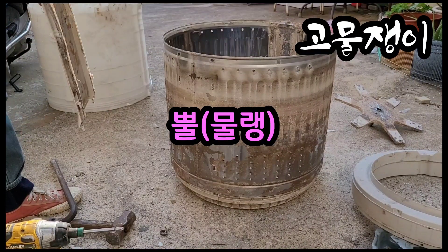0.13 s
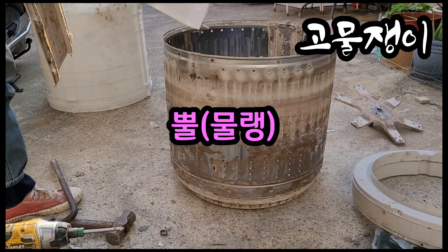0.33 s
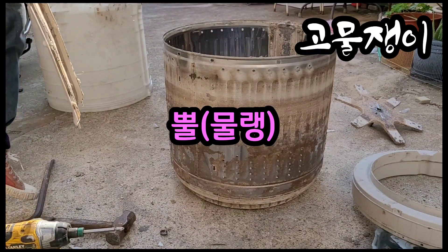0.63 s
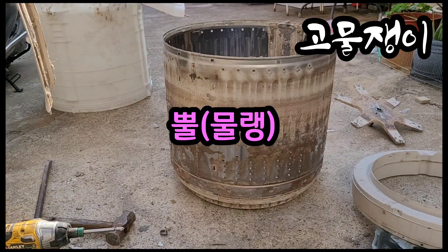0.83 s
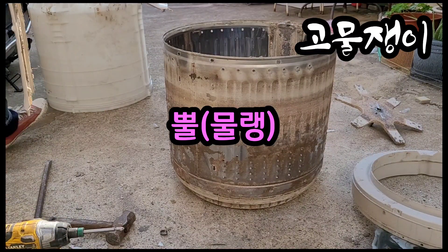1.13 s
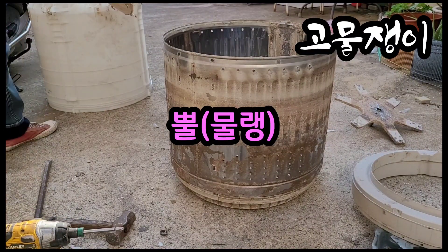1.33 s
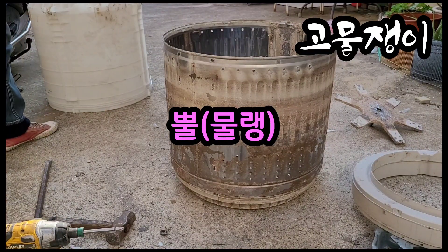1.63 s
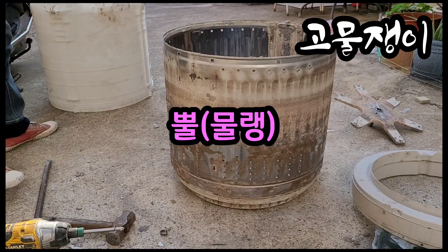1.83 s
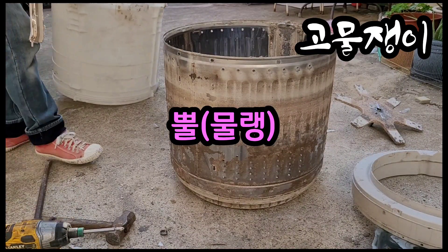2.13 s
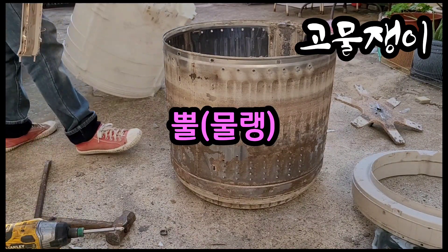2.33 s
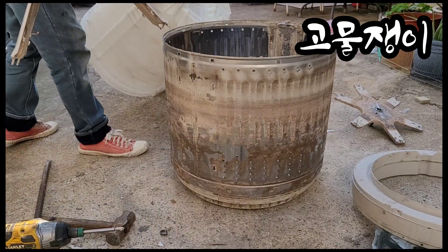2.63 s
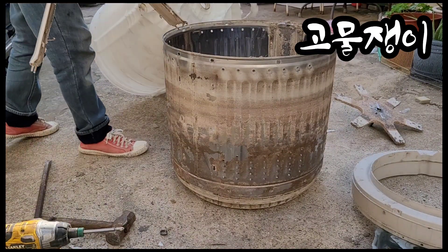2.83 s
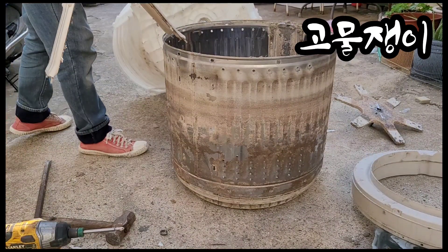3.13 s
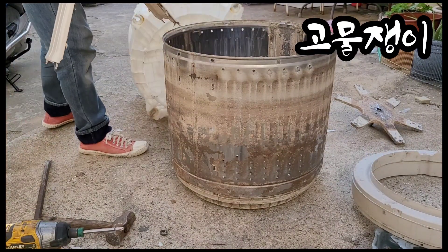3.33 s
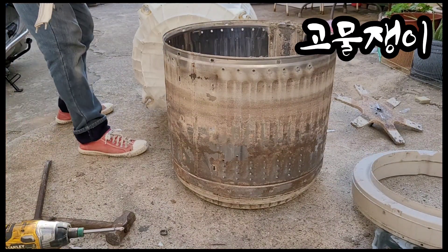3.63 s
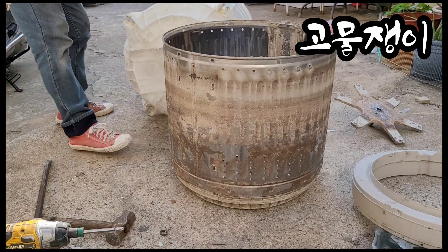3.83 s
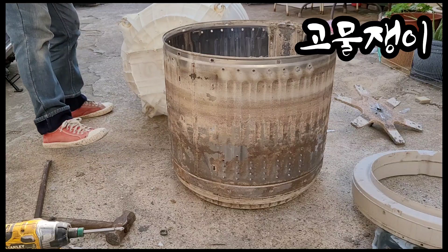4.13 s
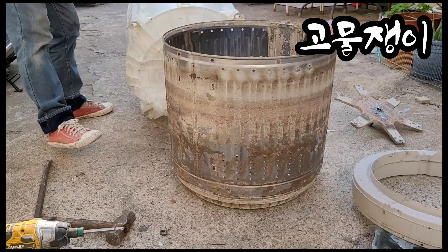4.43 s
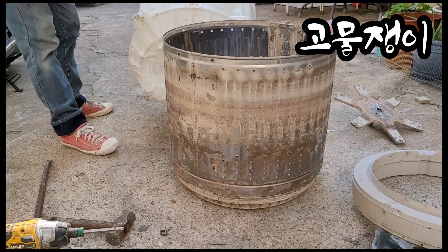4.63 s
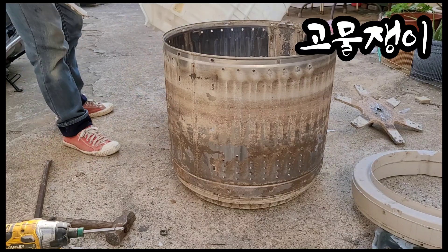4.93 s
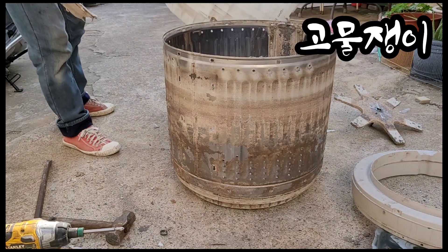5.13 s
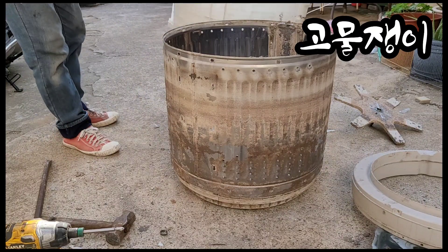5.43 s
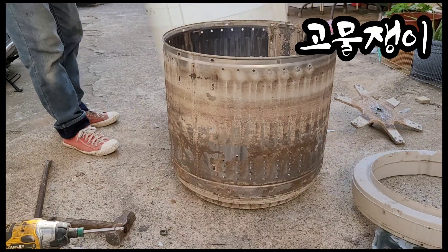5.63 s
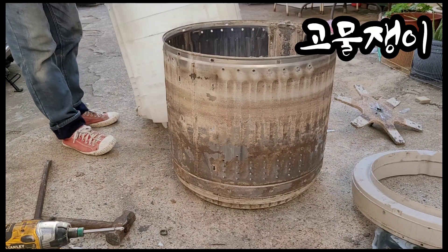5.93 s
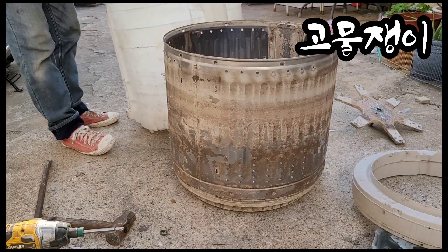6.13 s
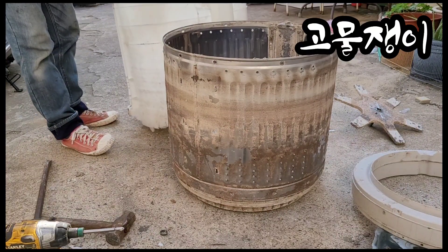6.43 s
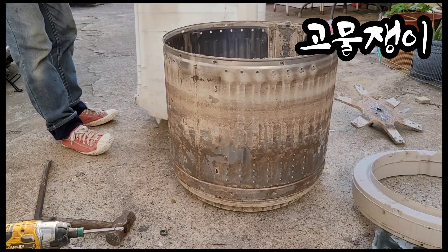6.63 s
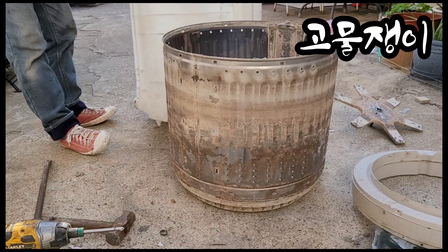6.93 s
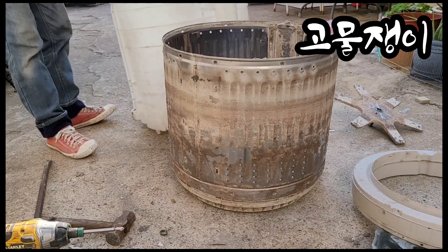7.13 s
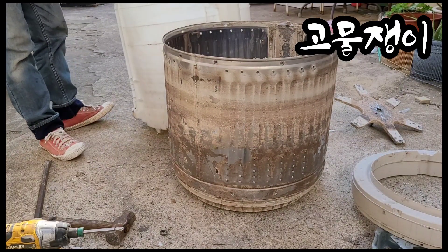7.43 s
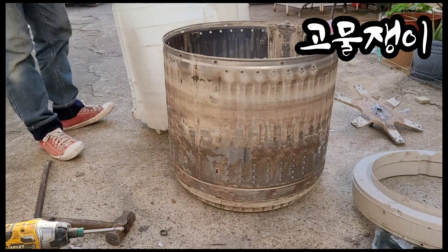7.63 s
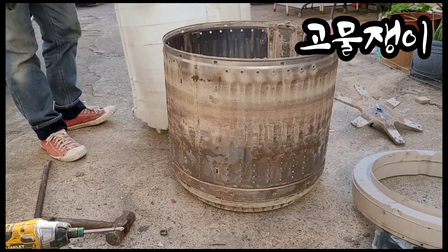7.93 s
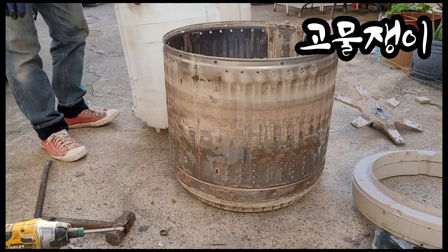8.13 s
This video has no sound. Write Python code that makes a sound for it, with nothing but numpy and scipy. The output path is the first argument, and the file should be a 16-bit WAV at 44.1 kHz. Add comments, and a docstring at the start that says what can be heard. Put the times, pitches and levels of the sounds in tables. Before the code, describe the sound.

After a short steel clatter, a big plastic tub is tipped, rolled and banged down outdoors, with hollow clacks, low booms and gritty scrapes.

```python
"""A light scrape and a few knocks of a plastic washing-machine tub, then a steel bar clatters onto concrete.
The tub is tipped, rolled against a steel drum and banged down: its walls clack, its floor booms, the air
inside sings on, and its rim judders over grit. The bumped drum hums and a tool chinks once.
Behind it all: a short tail off the yard's walls, low neighbourhood rumble and a faint far-off whine."""
import sys
import numpy as np
from scipy import signal
from scipy.fft import rfft, irfft, next_fast_len
from scipy.io import wavfile
from scipy.ndimage import uniform_filter1d

SR = 44100
rng = np.random.default_rng(int(sys.argv[2]) if len(sys.argv) > 2 else 0)


def file_out(sig):
    """Save sig as 16-bit WAV at sys.argv[1]."""
    # one column per channel
    cols = np.atleast_2d(sig).T
    # limit, then scale
    lim = np.clip(cols, -1, 1)
    pcm = np.round(lim * 32767).astype(np.int16)
    wavfile.write(sys.argv[1], SR, pcm)


N = 364707

# hits on the tub: t/s, body level/dB, body centre f/Hz, clack level/dB, crack level/dB, boom level/dB, t60/s
TUB_HITS = [(0.084, -40, 384, -44.5, -43, -62, 0.097), (.457, -37.5, 460, -54, -72, -54, 0.031),
            (.477, -41, 385, -46.5, -59, -55, 0.077), (.915, -27, 270, -27.5, -36, -32, .15),
            (.952, -28, 244, -38, -58, -43, 0.13), (1.005, -32, 584, -25, -63, -55, 0.16),
            (2.05, -26.5, 604, -53, -58, -32, 0.18), (2.066, -27, 259, -58, -68, -9, 0.24),
            (2.137, -45, 400, -67, -77, -12, .1), (2.185, -10, 750, -20, -32.5, -17, 0.12),
            (2.208, -18, 685, -25.5, -42, -35, 0.17), (2.349, -23.5, 430, -28, -48, -36, 0.15),
            (2.368, -16, 690, -28, -39, -21.5, 0.13), (2.393, -28, 480, -43, -58, -30, 0.11),
            (2.644, -55, 450, -47.5, -59, -29.5, 0.24), (3.149, -43, 477, -62, -72, -34.5, 0.11),
            (3.523, -20, 650, -33, -59, -39, 0.074), (3.569, -6.5, 587, -11, -39, -3.5, 0.059),
            (3.605, -22.5, 280, -31, -46, -11.5, 0.37), (3.674, -40, 403, -62, -70, -12.5, .1),
            (3.736, -30.5, 330, -55, -81, -11.5, 0.36), (3.798, -27.5, 680, -41, -53, -36, 0.17),
            (3.862, -22, 545, -47, -68, -7.5, 0.11), (3.947, -29, 300, -41, -48, -6, 0.14),
            (3.958, -37, 400, -28.5, -41, -20, 0.17), (4.582, -32.5, 655, -35.5, -64, -55, 0.17),
            (4.893, -44, 764, -27, -43, -56, 0.24), (5.07, -35.5, 515, -65, -62, -34.5, 0.13),
            (5.678, -24.5, 602, -47, -65, -45, 0.11), (5.812, -13, 710, -14, -16.5, -16, 0.15),
            (5.83, -13, 400, -20, -24.5, -5.5, 0.17), (5.87, -16.5, 446, -52, -64, -36, 0.12),
            (5.898, -29, 446, -50, -64, -9.5, 0.084), (6.011, -20.5, 377, -16.5, -24.5, -3, .16),
            (6.098, -17.5, 550, -39, -58, -24, 0.14), (6.11, -30, 300, -55, -70, -5.5, .12),
            (6.162, -18, 494, -40, -68, -10, .14), (6.223, -31, 450, -60, -76, -7.5, 0.12),
            (6.266, -25, 497, -31.5, -53, -20, 0.25), (6.301, -27, 450, -46, -46.5, -14, 0.29),
            (6.749, -31.5, 395, -63, -63, -15, 0.087), (6.863, -29, 630, -51, -46.5, -36, 0.12),
            (6.881, -34.5, 400, -55, -72, -11, .12), (6.93, -39, 400, -66, -75, -15.5, 0.064),
            (7.137, -42, 474, -47, -52.5, -26.5, 0.12), (7.233, -48, 400, -64, -70, -20, 0.11),
            (7.29, -29, 440, -56, -74, -23, .1), (7.566, -4.5, 414, -18, -26.5, -16, .18),
            (7.61, -16, 404, -42, -45, -11.5, 0.11), (7.644, -17, 504, -37, -33, -14, .16),
            (7.677, -27, 503, -26, -39, -18, .16), (7.772, -25.5, 740, -30.5, -40.5, -24.5, .13),
            (7.953, -44, 740, -16.5, -29, -28, 0.13), (8.033, -12.5, 390, -27, -62, -13, 0.11),
            (8.081, -46, 505, -25, -54, -47, 0.099), (8.134, -24.5, 347, -57, -77, -18.5, 0.1),
            (8.205, -27, 350, -40.5, -70, -21.5, 0.13)]
# resonances among the wall's dense modes: f/Hz, nominal width/Hz, lift/dB
WALL_PEAKS = [(320, 23, 1.5), (360, 14, 5.5), (420, 35, 4.5), (513.7, 18, 3.5), (795, 50, 3), (1010, 26, 2),
              (1163, 43, 3), (1312, 72, 2.5), (1370, 34, 0), (1684, 13, -1), (1746, 21, -4), (1975, 43, 4),
              (2096, 62, 3.5), (2050, 20, 2.5), (2550, 42, -3), (2692, 90, 3.5), (3133, 22, 7.5),
              (3310, 60, -0.5), (3500, 25, 2), (3250, 17, -1.5)]
# tone of the wall's clack: f/Hz, level/dB
CLACK_TONE = [(300, -17.5), (750, 4.5), (1150, 5.5), (1600, 3.5), (2100, -3), (3000, -13), (5000, -32.5),
              (12000, -66.5)]
# tone of cracks and grit: f/Hz, level/dB
CRACK_TONE = [(800, -29), (2200, 2.5), (3300, -1.5), (5000, -6), (6500, -10), (8200, -7.5), (11000, -12.5),
              (15500, -12)]
# the floor's note climbs as the tub is tipped, then stood on end: t/s, f/Hz
FLOOR_NOTE = [(2.1, 86), (2.35, 106.7), (3.55, 124), (3.96, 122.1), (5.83, 147), (6.3, 133.2), (7.3, 132.8),
              (7.6, 156), (8.1, 167.1)]
# shoves over the concrete: t/s, length/s, rub level/dB, rasp level/dB, grit level/dB, swell/dB
SHOVES = [(0, 0.11, -55.5, -57.5, -52, 6.5), (0.57, 0.49, -58.5, -57, -57.5, 21),
          (1.889, 0.099, -52, -56, -69, -13), (2.055, 0.19, -40, -67, -61, 9),
          (2.196, 0.24, -34.5, -44, -62, -5.5), (3.162, 0.24, -51, -60.5, -66.5, -8.5),
          (3.426, 0.15, -39.5, -48.5, -67, 4.5), (3.506, 0.052, -24, -27, -41.5, 1),
          (3.785, 0.18, -28.5, -43.5, -51, 1.5), (4.052, .12, -47, -80, -91, -4),
          (4.431, 0.165, -57, -44.5, -63.5, 8), (4.814, 0.067, -47, -42.5, -54.5, 12.5),
          (4.96, 0.027, -37.5, -49, -57.5, -1.5), (5.688, 0.14, -45.5, -47.5, -52, 18),
          (5.832, 0.24, -39, -47, -52, -4), (6.052, .28, -38, -48, -56, 3.5),
          (6.35, 0.1, -55, -54, -54.5, -9), (6.701, .2, -53.5, -68, -65.5, -18),
          (7.257, 0.018, -46, -49.5, -68, 2), (7.374, 0.021, -48, -52, -52.5, 0.5),
          (7.551, 0.26, -32, -49, -43, -14), (7.83, 0.16, -41.5, -44.5, -62, 5),
          (7.933, 0.042, -47, -38, -39, 4), (8.046, 0.3, -53.5, -51.5, -65, 8)]
# tone of the rim's rub: f/Hz, level/dB
RUB_TONE = [(100, -24.5), (220, 6), (400, 1.5), (800, 1.5), (1400, -15.5), (2200, -15), (3500, -25.5),
            (8000, -78)]
# tone of the rim's rasp: f/Hz, level/dB
RIM_RASP_TONE = [(250, -33.5), (550, 6), (900, 0.5), (1300, 7.5), (1650, -10), (2200, -19.5), (3300, -15),
                 (5000, -47.5), (12000, -37)]
# the tub rolls on its edge: t/s, length/s, rumble level/dB, quiver level/dB, swell/dB
TUB_ROLLS = [(2.216, .3, -40, -29.5, -12.5), (3.137, .12, -51, -41.5, 12), (3.476, .1, -36.5, -31, -10),
             (3.596, 0.53, -30.5, -29, -4), (4.15, 1.12, -45.5, -57, 0), (6.057, 0.29, -22, -21.5, -2.5),
             (6.367, 0.16, -36, -43, -2.5), (6.691, 0.66, -35.5, -36, -6), (7.58, 0.78, -45, -33.5, -10)]
# snaps of grit, splinters and the tub's brittle edge: t/s, level/dB, centre f/Hz, t60/s
DRY_SNAPS = [(0.08, -40.5, 3000, 0.045), (.353, -34.5, 3450, 0.03), (0.513, -41.5, 3860, 0.034),
             (0.662, -48.5, 4300, 0.052), (.872, -24.5, 3520, 0.0072), (1.488, -54, 1920, 0.22),
             (1.65, -51.5, 2900, 0.024), (2.895, -50.5, 1790, 0.12), (3.219, -52, 4060, 0.093),
             (3.432, -51, 3500, 0.14), (3.572, -22, 3240, 0.028), (4.894, -40, 1370, 0.068),
             (6.014, -27.5, 9900, .089), (6.321, -42, 4660, 0.028), (6.601, -46.5, 3000, 0.032),
             (6.715, -51, 2460, 0.058), (7.022, -56, 11000, .09), (7.243, -54, 4440, 0.024),
             (7.396, -47, 2500, .04), (7.568, -13.5, 2240, 0.013)]
# dull thuds on the ground: t/s, level/dB, f/Hz
GROUND_THUDS = [(1.914, -29.5, 95.7), (2.012, -32.5, 102), (4.512, -28, 75), (4.738, -22.5, 58),
                (4.785, -27, 95), (5.237, -24, 51.6), (5.699, -22.5, 64.5), (6.58, -31, 78)]
# the bar's contacts: t/s, level/dB, share taken on the flank rather than the tip/0-1
BAR_CONTACTS = [(0.917, -44.5, 0.4), (0.923, -32.5, 0.32), (1.003, -30, 0.6), (1.027, -29, 1),
                (1.049, -33.5, 1)]
# the bar's modes: f/Hz, tip-struck level/dB, flank-struck level/dB, t60/s before extra damping
BAR_MODES = [(1749, 1, -4, 0.31), (1841, -4, 0, 0.3), (2178, -7, -1, 0.24), (2515, -20, -22, 0.31),
             (2625, -17, -16, 0.33), (2766, -10, -6, 0.29), (3116, 3, -4, 0.33), (3327, -17, -16, 0.32),
             (3877, -12, -7, 0.29), (3957, -12, -7, 0.29), (4310, -10, -10, 0.28), (4983, -18, -9, 0.22),
             (5286, -13, -13, 0.31), (5601, -23, -15, 0.28), (6397, -22, -14, 0.23), (6905, -26, -6, 0.19),
             (7686, -21, -8, 0.19), (7996, -18, -9, 0.19), (8384, -11, -8, 0.21), (8724, -16, -11, 0.21),
             (9224, -18, -14, 0.24), (9789, -20, -18, 0.25), (10427, -17, -11, 0.26),
             (10625, -19, -12, 0.27), (11200, -23, -19, 0.34), (11674, -25, -15, 0.22),
             (12538, -30, -12, 0.19), (13459, -23, -16, 0.23), (14486, -25, -14, 0.21),
             (14657, -24, -13, 0.21)]
# bumps against the drum: t/s, level/dB
DRUM_BUMPS = [(3.571, -37.5), (3.951, -36), (5.832, -37)]
# the drum's modes: f/Hz, level/dB, t60/s
DRUM_MODES = [(249, 3.5, 1.8), (267.3, 3, 1.9), (270, 3, 1.7), (293, -11, 1.5), (290.7, -3, 2.9),
              (302, -5.5, 1.5), (313, 0.5, 1.2), (392, -15, 3.2), (443, -20, 1), (507, -18, 2.3)]
# a steel tool's modes: f/Hz, level/dB, t60/s
TOOL_MODES = [(4970, -56, 0.19), (5800, -44.5, 0.13), (6530, -48, 0.12), (7720, -40.5, 0.19),
              (8700, -46, 0.11), (9760, -49, 0.13), (11730, -58, 0.16), (12580, -57, 0.16)]
# path of the far-off whine: t/s, f/Hz, level/dB
FAR_WHINE = [(1.27, 830, -57), (1.308, 857, -54.5), (1.35, 744, -60), (1.4, 706, -47.5), (1.441, 766, -50),
             (1.6, 767, -53.5), (1.951, 766, -53), (2.05, 763, -58)]
# tone of the neighbourhood: f/Hz, level/dB
AMBIENCE_TONE = [(12, -30), (20, 0.5), (72, 2), (163, -17), (301, -17.5), (399, -15), (542, -21.5),
                 (759, -15.5), (1090, -28), (1330, -24.5), (1610, -31), (6720, -48), (12800, -47.5),
                 (16000, -69.5)]
# stereo width: f/Hz, likeness of left and right/0-1
STEREO_LIKENESS = [(30, 0.13), (70, 0.73), (140, 0.45), (260, 0.98), (500, 0.87), (1200, 0.33),
                   (4000, 0.92), (14000, .6)]
# stereo phase: f/Hz, lead of the left side/rad
LEFT_LEAD = [(40, .1), (150, 0.057), (300, 0.71), (600, 1.46), (1200, 2.6), (4000, 1.78), (14000, 1.5)]
# the tub stands a little to the left: f/Hz, left minus right level/dB
TUB_PAN = [(100, -1.5), (450, 0.5), (1100, 1), (2500, 2), (5000, 0.5), (13000, 1.5)]


def tub_knocks():
    """Each hit wakes the hollow body, the stiff wall and a crack at the point of contact."""
    out = np.zeros((2, N))
    for s, body_db, body_hz, clack_db, crack_db, _, t60 in TUB_HITS:
        def colour(hz):
            body = amp(body_db) * unit(hump(hz, body_hz, sharpness=1.0) * tub_wall(hz))
            clack = amp(clack_db) * unit(amp(curve(CLACK_TONE, hz)) * tub_wall(hz))
            crack = amp(crack_db) * unit(amp(curve(CRACK_TONE, hz)))
            return np.sqrt(body ** 2 + clack ** 2 + crack ** 2)
        add(out, s, burst(colour, t60, tick=0.14))
    return out


def tub_wall(hz):
    """The wall's resonances, as a set of bell-shaped boosts and cuts."""
    return amp(sum(db * np.exp(-2.8 * ((hz - f) / (1.3 * width)) ** 2) for f, width, db in WALL_PEAKS))


def tub_booms(cavity_hz=152.6, cavity_db=-14, cavity_t60=0.73, build_s=0.02, lag_s=0.002, cycles=19):
    """Each hit sets the tub's floor swinging; the air inside takes up the energy and sings on."""
    out, t = np.zeros((2, N)), np.arange(SR) / SR
    build = 1 - np.exp(-(t / build_s) ** 2)
    cavity = build * amp(cavity_db - 60 * t / cavity_t60) * np.sin(2 * np.pi * cavity_hz * t)
    for s, *_, boom_db, _ in TUB_HITS:
        hz = np.interp(s, *np.transpose(FLOOR_NOTE))
        add(out, s + lag_s, amp(boom_db) * swing(hz, t60=cycles / hz))
        add(out, s + lag_s, amp(boom_db) * cavity)
    return out


def swing(hz, t60, rise_s=0.0051, sag=0.054):
    """A low note that sags as the flex relaxes, with slower rocking below and a short overtone above."""
    t = np.arange(SR // 2) / SR
    sides = np.array([[-1], [1]])
    envelope = (1 - np.exp(-(t / rise_s) ** 2)) * amp(-60 * t / t60)
    turns = np.cumsum(hz * (1 + sag * np.exp(-t / 0.028))) / SR
    flex = np.sin(2 * np.pi * turns + 0.12 * sides)
    rock = np.exp(-t / 0.015) * np.sin(2 * np.pi * (0.666 * turns + rng.random()) + 0.6 * sides)
    overtone = amp(-60 * t / 0.11) * np.sin(2 * np.pi * (1.5 * turns + rng.random()) - 0.4 * sides)
    return envelope / envelope.max() * (flex + amp(-11) * (rock + overtone))


def tub_scrapes():
    """With each shove the rim judders over the concrete, rasps and crushes grit."""
    s, length, rub_db, rasp_db, grit_db, swell_db = np.transpose(SHOVES)
    rub = stream(slips(per_s=900), lambda hz: amp(curve(RUB_TONE, hz)) * tub_wall(hz))
    grit = stream(slips(per_s=2500), lambda hz: amp(curve(CRACK_TONE, hz)))
    rasp = stream(slips(per_s=520), lambda hz: amp(curve(RIM_RASP_TONE, hz)) * tub_wall(hz))
    return sum(sound * strokes(s, length, db, swell_db, attack_s=0.02, t60=0.29)
               for sound, db in [(rub, rub_db), (rasp, rasp_db), (grit, grit_db)])


def slips(per_s, judder_db=2.0):
    """Uneven stick-slip clicks over a fine hiss, surging as the rim grips and lets go."""
    sizes = rng.exponential(1, N) * (rng.random(N) < per_s / SR)
    grip = wobble(N, span=400)
    clicks = unit(sizes * rng.choice([-1., 1.], (2, N)))
    hiss = 0.83 * rng.standard_normal((2, N))
    return amp(judder_db * grip) * (clicks + hiss)


def tub_rolls(rumble_hz=75, jolt_hz=14):
    """The rolling weight rumbles, and small jolts keep the floor quivering at its own note."""
    s, length, rumble_db, quiver_db, swell_db = np.transpose(TUB_ROLLS)
    rumble = stream(rng.standard_normal((2, N)), lambda hz: hump(hz, rumble_hz, sharpness=1.03))
    lowpass = signal.butter(2, jolt_hz, fs=SR, output="sos")
    jolts = signal.sosfilt(lowpass, rng.standard_normal(N) + 1j * rng.standard_normal(N))
    turns = np.cumsum(np.interp(np.arange(N) / SR, *np.transpose(FLOOR_NOTE))) / SR
    quiver = unit(np.sqrt(abs(jolts)) * np.sin(2 * np.pi * turns + np.angle(jolts)))
    return sum(sound * strokes(s, length, db, swell_db, attack_s=0.014, t60=0.22)
               for sound, db in [(rumble, rumble_db), (quiver, quiver_db)])


def grit_snaps(crack_db=-17):
    """Grit and splinters snap: one band of noise with a little broad crack under it."""
    out = np.zeros((2, N))
    for s, db, centre_hz, t60 in DRY_SNAPS:
        def colour(hz):
            return amp(db) * (hump(hz, centre_hz, sharpness=1.1) + amp(crack_db + curve(CRACK_TONE, hz)))
        add(out, s, burst(colour, t60, tick=0.33))
    return out


def ground_thuds(t60=0.17):
    """Soft, low thuds with no clack."""
    out = np.zeros((2, N))
    for s, db, hz in GROUND_THUDS:
        add(out, s, amp(db) * swing(hz, t60))
    return out


def steel_bar(jangle_db=-5, smear_hz=90, damping=1.25, twin_db=-8, detune=0.008, db_per_octave=1.5):
    """The bar lands tip first and rattles flat; every contact adds energy to its modes."""
    out, t = np.zeros((2, N)), np.arange(SR) / SR
    hz, tip_db, flank_db, t60 = np.transpose(BAR_MODES)[:, :, None]
    bright_db = db_per_octave * np.log2(hz / hz[0])  # the higher modes ring a little louder
    energy, landing_s = 0, BAR_CONTACTS[0][0]
    for s, db, flank in BAR_CONTACTS:
        mode_db = tip_db + flank * (flank_db - tip_db) + bright_db
        age = t - (s - landing_s)
        energy = energy + (age >= 0) * amp(db + mode_db - 60 * damping * abs(age) / t60) ** 2

        def jangle(f):  # chatter on the concrete smears each mode into a narrow band
            bands = amp(mode_db) / (1 + ((f - hz) / smear_hz) ** 2) ** 2
            return amp(db + jangle_db) * unit(bands.sum(0))
        add(out, s, burst(jangle, t60=0.38, tick=0.25))
    # the bar bends in two planes, so each mode has a weaker twin close by
    twin_hz = hz * (1 + detune * rng.standard_normal(hz.shape))
    for plane_db, plane_hz in (0, hz), (twin_db, twin_hz):
        phase = rng.uniform(0, 2 * np.pi, hz.shape) + np.array([-0.7, 0.7])[:, None, None]
        modes = np.sqrt(energy) * np.sin(2 * np.pi * plane_hz * t + phase)
        add(out, landing_s, amp(plane_db) * modes.sum(1))
    return out


def tool_chink(at_s=2.368):
    """A steel tool on the ground rings once, high and short."""
    out = np.zeros((2, N))
    add(out, at_s, ring(TOOL_MODES, spread_rad=0.94))
    return out


def drum_hum():
    """The steel drum's close, low modes hum on after each bump."""
    out = np.zeros((2, N))
    for s, db in DRUM_BUMPS:
        add(out, s, amp(db) * ring(DRUM_MODES, spread_rad=0.39))
    return out


def yard_reverb(x, wet_db=-12, echoes_per_s=3000, predelay_s=0.014):
    """Nearby walls return a short tail with little bass."""
    t60 = [(200, 0.68), (1000, 0.22), (4000, 0.26), (14000, 0.066)]  # f/Hz, t60/s
    tone = [(100, -6.5), (300, -1.0), (3000, 1), (14000, 7.5)]  # f/Hz, level/dB
    echoes = rng.choice([-1., 1.], (2, SR)) * (rng.random((2, SR)) < echoes_per_s / SR)
    echoes *= np.arange(SR) / SR > predelay_s
    hz, t, spectra = signal.stft(echoes, SR, nperseg=256)
    fade = amp(curve(tone, hz)[:, None] - 60 * t / curve(t60, hz)[:, None])
    _, tail = signal.istft(spectra * fade, SR, nperseg=256)
    return amp(wet_db) * signal.fftconvolve(x, tail / np.linalg.norm(tail[0]), axes=1)[:, :N]


def far_whine():
    """One faint, wavering tone in the distance."""
    s, hz, db = np.transpose(FAR_WHINE)
    t = np.arange(N) / SR
    turns = np.cumsum(np.interp(t, s, hz)) / SR
    return amp(np.interp(t, s, db, left=-120, right=-120)) * np.sin(2 * np.pi * turns)


def neighbourhood(level_db=-47.5):
    """A steady bed of low outdoor rumble."""
    return amp(level_db) * stream(rng.standard_normal((2, N)), lambda hz: amp(curve(AMBIENCE_TONE, hz)))


def burst(colour, t60, tick, ripple_db=3.0, rattles_per_s=70, size=16384):
    """A sharp contact, then countless overlapping modes dying together while the edge chatters."""
    t, hz = np.arange(size) / SR, np.fft.rfftfreq(size, 1 / SR)
    rattles = rng.exponential(1, size) * (rng.random(size) < rattles_per_s / SR)
    chatter = signal.lfilter([1], [1, -np.exp(-1 / (0.0044 * SR))], rattles)
    decay = amp(-60 * t / t60)
    envelope = decay * (7.2 + 0.42 * np.minimum(chatter, 2)) + tick * np.exp(-t / 0.0008)
    envelope *= 1 - np.exp(-t / 0.00082)  # the material gives a little before it cracks
    spectrum = stereo(rfft(rng.standard_normal((2, size)) * envelope), hz)
    spectrum /= np.sqrt(uniform_filter1d(abs(spectrum) ** 2, size=101))  # a short hit feeds all bands
    ripple = unit(amp(ripple_db * wobble(len(hz), span=25)))  # the spot struck favours some modes
    fade_out = np.sqrt(np.clip(1.6 - 2 * t / t[-1], 0, 1))
    return irfft(spectrum * causal(colour(hz) * ripple)) * np.linalg.norm(decay) * fade_out


def ring(modes, spread_rad):
    """Dying modes, each with its own phase left and right."""
    t = np.arange(int(SR * max(t60 for _, _, t60 in modes))) / SR
    phases = rng.uniform(0, 2 * np.pi, (len(modes), 1, 1))
    phases = phases + spread_rad * rng.standard_normal((len(modes), 2, 1))
    return sum(amp(db - 60 * t / t60) * np.sin(2 * np.pi * hz * t + phase)
               for (hz, db, t60), phase in zip(modes, phases))


def strokes(starts, lengths, levels_db, swells_db, attack_s, t60):
    """Envelope of a series of pushes: each sets in, swells or slackens, then dies away."""
    t, power = np.arange(N) / SR, np.zeros(N)
    for s, length, db, swell_db in zip(starts, lengths, levels_db, swells_db):
        during = (t >= s) & (t < s + length + 2 * t60)
        age = t[during] - s
        hold_db = swell_db * (np.minimum(age / length, 1) - 0.5)
        release_db = -60 * np.maximum(age - length, 0) / t60
        power[during] += (np.minimum(age / attack_s, 1) * amp(db + hold_db + release_db)) ** 2
    return np.sqrt(power)


def stream(drive, colour):
    """Shapes a long two-channel excitation into a stereo texture of unit rms."""
    size = next_fast_len(N)
    hz = np.fft.rfftfreq(size, 1 / SR)
    return unit(irfft(stereo(rfft(drive, size), hz) * colour(hz), size)[:, :N])


def stereo(spectra, hz):
    """Blends two unrelated spectra into a partly alike pair, the left side leading."""
    left, other = spectra
    likeness = curve(STEREO_LIKENESS, hz)
    right = likeness * left + np.sqrt(1 - likeness ** 2) * other
    return np.array([left, right * np.exp(-1j * curve(LEFT_LEAD, hz))])


def pan_left(x):
    """Leans the mids and treble to the left."""
    size = next_fast_len(N)
    tilt_db = curve(TUB_PAN, np.fft.rfftfreq(size, 1 / SR)) * np.array([[0.5], [-0.5]])
    return irfft(rfft(x, size) * amp(tilt_db), size)[:, :N]


def causal(gain):
    """A minimum-phase filter with this gain: it rings only after the hit."""
    log_gain = np.log(np.maximum(gain, gain.max() * 1e-5))
    mirrored = np.r_[log_gain, log_gain[-2:0:-1]]
    return np.exp(np.conj(signal.hilbert(mirrored)))[:len(gain)]


def hump(hz, centre_hz, sharpness):
    """A broad resonance with steep skirts and unit power."""
    ratio = (hz + 1) / centre_hz
    return unit(1 / (1 + (sharpness * (ratio - 1 / ratio)) ** 2))


def wobble(count, span):
    """A smooth random curve of unit rms."""
    return unit(uniform_filter1d(uniform_filter1d(rng.standard_normal(count), span), span))


def curve(points, hz):
    """Reads a curve on a log-frequency axis."""
    f, value = np.transpose(points)
    return np.interp(np.log(hz + 1), np.log(f + 1), value)


def add(mix, s, sound):
    """Mixes a sound in at time s."""
    part = mix[:, round(s * SR):][:, :sound.shape[-1]]
    part += sound[..., :part.shape[1]]


def amp(db):
    """Decibels to gain."""
    return 10 ** (np.asarray(db) / 20)


def unit(x):
    """Scales to an rms of one."""
    return x / np.sqrt(np.mean(abs(x) ** 2) + 1e-20)


def scene():
    """Plastic and steel up front with the yard's reverb; the low end and the background stay dry."""
    tub = pan_left(tub_knocks() + grit_snaps() + tub_scrapes())
    near = tub + steel_bar() + tool_chink() + drum_hum()
    tail = yard_reverb(near)
    low_end = tub_booms() + tub_rolls() + ground_thuds()
    return near + tail + low_end + far_whine() + neighbourhood()


def record(dry, cutoff_hz=16100):
    """A soft clip rounds the loudest peaks, then a steep low-pass trims the top."""
    rounded = dry / (1 + dry ** 8) ** (1 / 8)
    lowpass = signal.firwin(301, cutoff_hz, window=("kaiser", 9), fs=SR)
    return signal.oaconvolve(rounded, lowpass[None], "same")


dry = scene()
out = record(dry)
file_out(out)
```